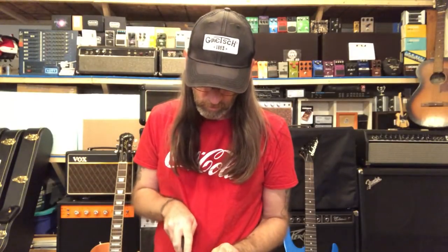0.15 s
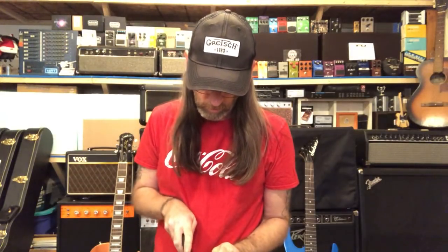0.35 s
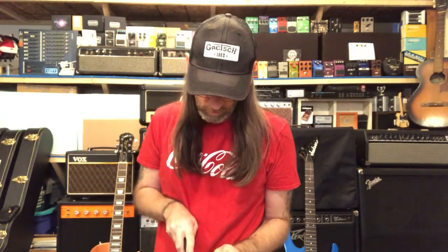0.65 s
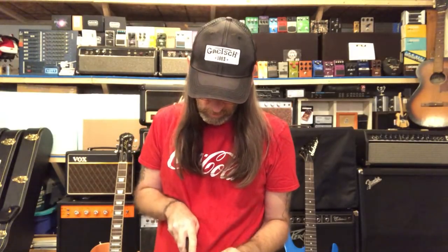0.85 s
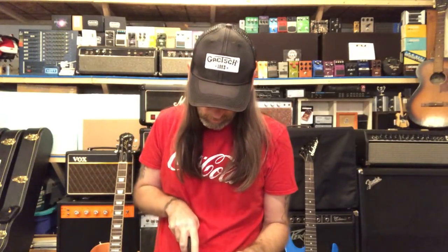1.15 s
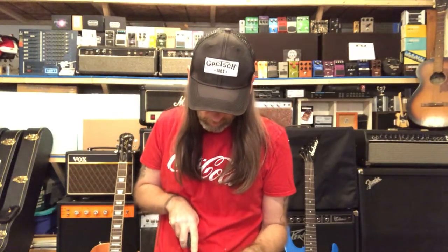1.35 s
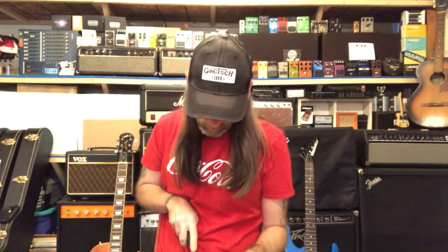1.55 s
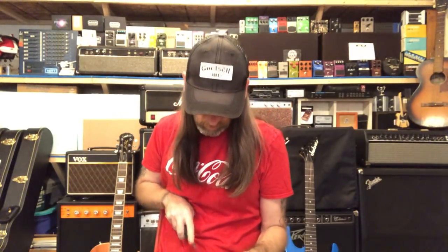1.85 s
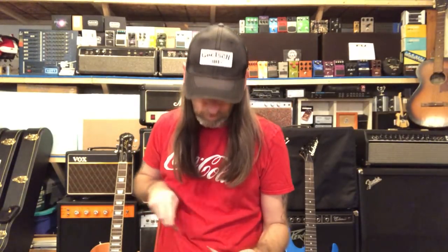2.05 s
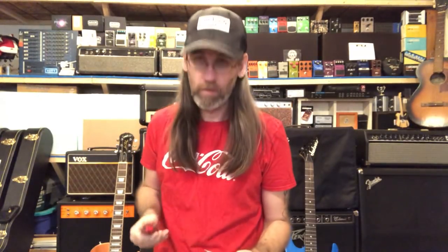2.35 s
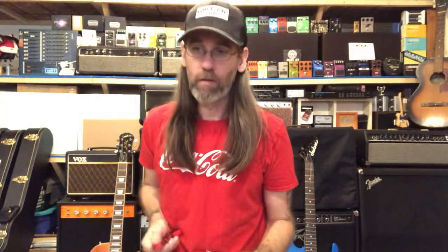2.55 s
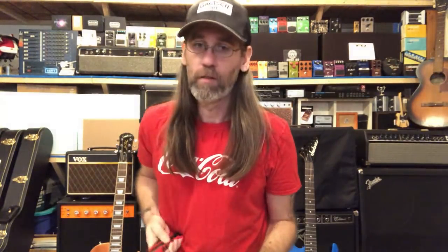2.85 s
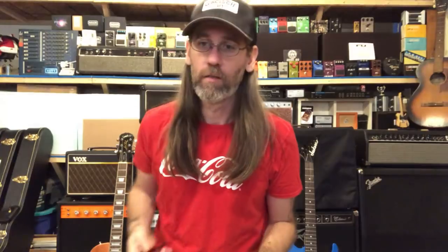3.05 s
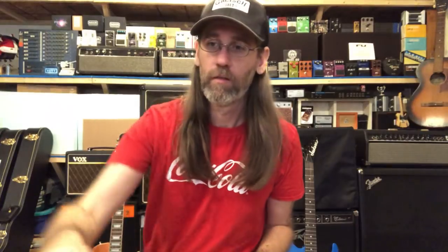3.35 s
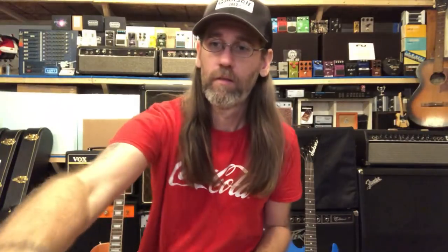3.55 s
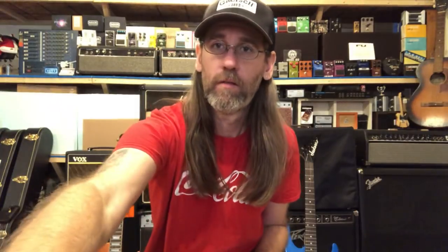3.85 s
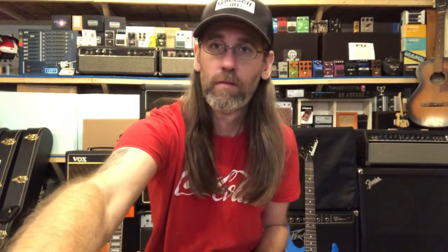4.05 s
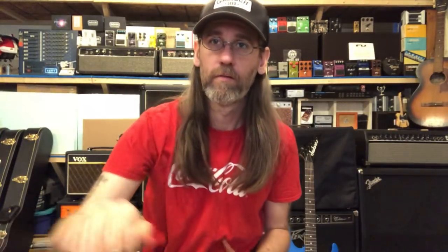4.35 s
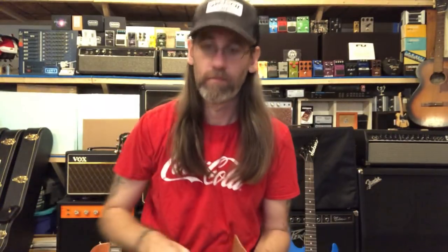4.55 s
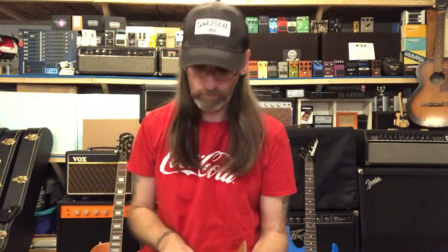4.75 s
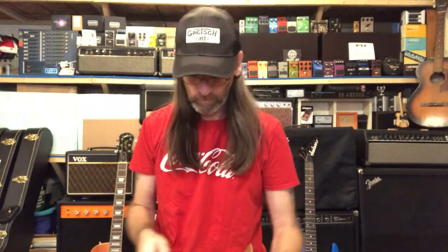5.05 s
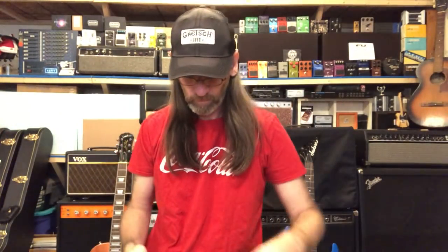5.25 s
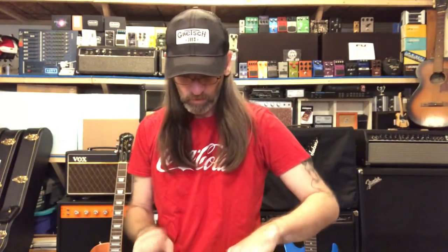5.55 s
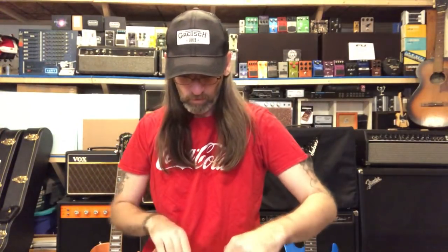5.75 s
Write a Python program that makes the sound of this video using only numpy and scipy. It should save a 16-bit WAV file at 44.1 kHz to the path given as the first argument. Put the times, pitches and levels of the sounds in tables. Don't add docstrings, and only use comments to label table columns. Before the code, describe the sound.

Rough tape cutting on a hollow box, rapid slider clicks, a hard knock of a dropped knife, then quieter cardboard folding.

```python
import sys
import numpy as np
from scipy import signal
from scipy.fft import rfft, irfft, next_fast_len
from scipy.io import wavfile

SR = 44100
rng = np.random.default_rng(int(sys.argv[2]) if len(sys.argv) > 2 else 0)


def wav_out(sig):
    wavfile.write(sys.argv[1], SR, np.round(np.clip(np.atleast_2d(sig).T, -1, 1) * 32767).astype(np.int16))


def decibels_to_gain(level_db):
    exponent = np.asarray(level_db, float) / 20
    return 10 ** exponent


N = 261069

# f/Hz, width/Hz, level/dB
BOX_MODES = [(179, 23, -7.5), (249.5, 29, -3.5), (294, 22, -2), (358, 44, -2.5), (405, 60, -1.5),
             (449.5, 54.5, 1), (602, 130, -5)]
# f/Hz, width/Hz, level/dB
FLAP_MODES = [(690, 130, -2), (963, 270, 0.5), (1150, 194, 2), (1560, 1500, -1.5), (2000, 430, -4)]


def in_time(rows):
    s, *columns = np.transpose(rows)
    return np.array([np.interp(np.arange(N) / SR, s, c) for c in columns])


def at_hz(points, hz):
    point_hz, value = np.transpose(points)
    return np.interp(np.log(np.maximum(hz, 1)), np.log(point_hz), value)


def rms_one(x):
    return x / np.sqrt(np.mean(x ** 2) + 1e-20)


def band(x, low_hz, high_hz):
    sos = signal.butter(2, [low_hz, min(high_hz, .45 * SR)], "band", fs=SR, output="sos")
    return signal.sosfilt(sos, x)


def coloured(x, spectrum):
    size = next_fast_len(len(x))
    gain = decibels_to_gain(at_hz(spectrum, np.fft.rfftfreq(size, 1 / SR)))
    return rms_one(irfft(rfft(x, size) * gain, size)[:len(x)])


def drift(rate_hz, size=N):
    r, run_in = np.exp(-2 * np.pi * rate_hz / SR), int(SR / rate_hz)
    white = rng.standard_normal(size + run_in)
    return rms_one(signal.lfilter([1], [1, -2 * r, r * r], white)[run_in:])


def ring(clicks, hz, t60_s):
    r, w = decibels_to_gain(-60 / (t60_s * SR)), 2 * np.pi * hz / SR
    return signal.lfilter([0, np.sin(w)], [1, -2 * r * np.cos(w), r * r], clicks + 1e-18)


def strike(times_s, level_db, modes, spread_db):
    chance = rng.standard_normal((len(times_s), len(modes)))
    out = np.zeros(N)
    for k, (hz, mode_db, t60_s) in enumerate(modes):
        clicks = np.zeros(N)
        clicks[(times_s * SR).astype(int)] = decibels_to_gain(level_db + mode_db + spread_db * chance[:, k])
        out += ring(clicks, hz, t60_s) * (-1) ** k
    return out


def bursts(times_s, level_db, rise_s, fall_s):
    t = np.arange(int(.3 * SR)) / SR
    shape = (1 - np.exp(-t / rise_s)) ** 2 * np.exp(-t / fall_s)
    out = np.zeros(N + len(t))
    for s, gain in zip(times_s, decibels_to_gain(level_db) / shape.max()):
        start = int(s * SR)
        out[start:start + len(t)] += gain * shape
    return out[:N]


def grains(per_s, size_db, clump_db):
    born = rng.random(N) < per_s * decibels_to_gain(clump_db * drift(25)) / SR
    size = decibels_to_gain(size_db * np.minimum(rng.exponential(1, N), 4))
    return born * size * rng.choice([-1, 1], N)


def spots(noise, times_s, centres_hz, spread):
    out = np.zeros(N)
    starts = (np.append(times_s, times_s[-1] + .3) * SR).astype(int) - 100
    for a, b, hz in zip(starts, starts[1:], centres_hz):
        out[a:b] = rms_one(band(noise[a:b], hz / spread, hz * spread))
    return out


def strokes(rows, mix_db):
    bright_share = [-0.46, 0.13, 0.59, 0.72]
    release_db_per_s = [230.6, 250, 206, 313]
    climb_db = 25.5
    t, out = np.arange(N) / SR, np.zeros((4, N))
    for s, rise_s, hold_s, db, bright_db in rows:
        near = slice(max(int((s - 3 * rise_s) * SR), 0), int((s + hold_s + .3) * SR))
        below_db = climb_db * np.clip((s - t[near]) / rise_s, 0, None)
        letting_go_db = np.outer(release_db_per_s, np.clip(t[near] - s - hold_s, 0, None))
        layer_db = (mix_db + bright_db * np.array(bright_share))[:, None]
        out[:, near] += decibels_to_gain(db + layer_db - below_db - letting_go_db)
    return out


def body(slips, modes):
    out = np.zeros(N)
    for k, (hz, width_hz, db) in enumerate(modes):
        swell = decibels_to_gain(db + 2 * drift(8))
        out += swell * (-1) ** k * rms_one(ring(slips, hz, 2.87 / width_hz))
    return rms_one(out)


def patchy(x):
    edges_hz = 600 * 2 ** np.arange(0, 4, .75)
    out = np.zeros(N)
    for k, (low_hz, high_hz) in enumerate(zip(edges_hz, edges_hz[1:])):
        out += (-1) ** k * band(x, low_hz, high_hz) * decibels_to_gain(2.5 * drift(12))
    return out


def handling():
    # full level at t/s, rise/s, hold/s, level/dB, brightness/dB
    cuts = [(.113, 0.0012, 0.062, -44, 1), (.37, 0.067, 0.051, -54.5, 5), (.505, 0.023, 0.059, -49.5, 3.5),
            (.615, 0.024, 0.02, -35.5, -0.5), (.855, 0.11, 0.0056, -45.5, 3.5),
            (.94, 0.055, 0.033, -36.5, -1), (1.075, 0.011, 0.065, -48.5, -0.5),
            (1.15, 0.14, 0.033, -44.5, -5.5), (1.3, 0.19, 0.019, -48, -4), (1.45, 0.093, 0.023, -38.5, 0.5),
            (1.54, 0.071, 0.081, -51, -8.5), (1.63, 0.034, 0.019, -38, 0), (1.75, 0.021, 0.0094, -57, 13.5),
            (1.805, 0.023, 0.026, -44.5, 16), (1.84, 0.015, 0.035, -42, -16.5),
            (1.897, 0.0043, 0.0066, -49.5, 24.5)]
    fidgets = [(2.1, 0.12, .45, -67, -8.5), (2.312, .004, 0.041, -67.5, 15.5),
               (2.42, 0.034, 0.14, -68.5, 10), (2.61, 0.027, 0.055, -62.5, 10), (3.2, 0.045, .6, -69, -5.5),
               (3.486, 0.045, .008, -75, 15), (3.598, .004, .005, -72.5, 23), (3.74, .04, 0.017, -70, 5),
               (3.79, 0.066, .015, -64.5, 3), (3.87, 0.014, .005, -56, 12),
               (3.937, .004, 0.033, -46.5, -9.5)]
    folds = [(4.2, .02, 0.059, -64, -5), (4.31, .06, 0.16, -60.5, -5.5), (4.52, .04, 0.11, -68.5, 5),
             (4.62, 0.0063, 0.0073, -54.5, -11), (4.65, 0.011, 0.083, -74.5, 25.5),
             (4.78, 0.059, 0.064, -53.5, -1), (4.86, 0.028, 0.045, -58.5, -3),
             (4.95, 0.032, 0.047, -67.5, 8.5), (5.04, 0.1, 0.062, -59.5, 0),
             (5.15, 0.13, 0.08, -57.5, -0.5), (5.322, .01, 0.01, -67.5, -16), (5.44, 0.1, 0.025, -47.5, -2),
             (5.53, 0.023, 0.098, -58.5, 6.5), (5.66, 0.15, 0.079, -64, 6), (5.8, 0.16, 0.042, -50.5, 1),
             (5.88, .02, 0.057, -69.5, 25)]
    cut_mix_db = [-1, -5, -5.5, -10.5]
    fidget_mix_db = [-6.5, -12, -2, -12]
    fold_mix_db = [-3, -3.5, -2, -3]
    # f/Hz, density/dB per Hz
    rasp_spectrum = [(900, -26.5), (1500, -8.5), (2200, -9), (3100, -9), (4300, -6.5), (5200, -8),
                     (6500, -8), (8000, -7.5), (10000, -13.5), (16000, -19.5)]
    # f/Hz, t60/s, level/dB
    blade_sing = [(3000, 0.0065, -12), (4050, 0.002, -19.5)]

    drive = strokes(cuts, cut_mix_db) + strokes(fidgets, fidget_mix_db) + strokes(folds, fold_mix_db)
    box, flap, rasp, fine = drive
    slips = grains(500, size_db=1.5, clump_db=1.5)
    tearing = rms_one(grains(2000, size_db=1.0, clump_db=7.0))
    tearing += 0.64 * rms_one(slips) + 0.4 * rng.standard_normal(N)
    fibres = coloured(tearing, rasp_spectrum)
    dull = signal.sosfiltfilt(signal.butter(2, 5500, fs=SR, output="sos"), fibres)
    sing = np.zeros(N)
    for hz, t60_s, db in blade_sing:
        sing += decibels_to_gain(db + 4 * drift(5.8)) * rms_one(ring(tearing, hz, t60_s))
    sing *= np.arange(N) < 2 * SR
    hollow = band(box * body(slips, BOX_MODES) + flap * body(slips, FLAP_MODES), 170, 4000)
    torn = rasp * (rms_one(patchy(dull)) + sing) + fine * rms_one(fibres - dull)
    return decibels_to_gain(-2.5) * hollow + decibels_to_gain(-5.0) * torn


def taps():
    # t/s, snap/dB, thud/dB, crackle re snap/dB, flap re snap/dB
    snaps = [(0.1132, -27, -28.5, -1, -8), (0.359, -57, -54, -19, 6), (.5, -51, -56, -15, 8),
             (.525, -37, -50, -15, -5), (.609, -31.5, -26, -14, -22), (0.6437, -42, -26, -24, -13),
             (0.8486, -34, -46, -21, -2), (0.906, -31.5, -53, -21, -16), (.924, -30, -55, -12, -13),
             (0.944, -35, -49, -17, 6), (0.9658, -28.5, -48, -19, -5), (1.0084, -47, -32, -21, -17),
             (1.0703, -43.5, -31.5, -23, 11), (1.41, -44, -40, -10, -3), (1.4296, -55, -55, 0, -5),
             (1.4562, -32, -52, -12, -12), (1.4485, -38, -63, -24, 13.5), (1.5875, -37, -30, -13, 4),
             (1.605, -46, -55, -15, -10), (1.6285, -36, -51, -14, 3), (1.6573, -32, -42, -11, -6),
             (1.7514, -43.5, -55, -14, 5), (1.7847, -45, -34.5, -8, 5.5), (1.798, -40.5, -45, -10, 12),
             (1.8254, -27.5, -28, -0.5, 4), (1.8295, -25.5, -26, -13, -3), (1.8588, -42, -29, -8, -10),
             (1.8697, -38, -27.5, -24, -17), (1.887, -42, -46, -5, -10), (1.8948, -25, -46, 0.5, 2.5),
             (1.8978, -30, -50, -15, -17), (1.9025, -27, -55, -15, -5)]
    # t/s, snap/dB, snap centre f/Hz, thud/dB
    ticks = [(1.6319, -35, 4800, -29), (1.6605, -39, 4900, -49), (2.316, -34, 3900, -75),
             (2.322, -39, 3740, -71), (2.416, -41.5, 3660, -73), (2.4255, -37, 4380, -75),
             (3.371, -55, 7600, -71), (3.489, -51.5, 6800, -76), (3.597, -44.5, 6800, -65),
             (3.714, -49.5, 3000, -73.5), (3.746, -51, 3990, -72), (4.354, -50.5, 2194, -70),
             (4.4453, -50, 2210, -41), (4.366, -54, 11000, -75), (4.456, -54, 9000, -77),
             (4.6191, -34, 1000, -33), (4.647, -41.5, 6500, -40), (4.779, -56, 1200, -34.5),
             (4.854, -40, 1620, -34), (4.873, -38.5, 1590, -39), (4.895, -48, 1600, -36.5),
             (5.3181, -35, 797, -44.5), (5.3875, -49, 5160, -45), (5.41, -47, 5460, -63),
             (5.457, -45, 2020, -59), (5.484, -47, 2000, -44), (5.529, -44, 3900, -57)]
    tape_hz = 3000

    rows = [(s, db, tape_hz, db + crackle, thud, db + flap) for s, db, thud, crackle, flap in snaps]
    rows += [(s, db, hz, db - 21.5, thud, (db + thud) / 2 - 32) for s, db, hz, thud in ticks]
    s, snap_db, snap_hz, crackle_db, thud_db, flap_db = np.transpose(sorted(rows))
    box_ring = [(hz, db, 2.0 / width_hz) for hz, width_hz, db in BOX_MODES]
    flap_ring = [(hz, db, 3.3 / width_hz) for hz, width_hz, db in FLAP_MODES]
    thud = strike(s, thud_db - 7.0, box_ring, spread_db=2.0)
    thud += strike(s, flap_db - 5.5, flap_ring, spread_db=2)
    noise = rng.standard_normal(N)
    snap = bursts(s, snap_db - 10.0, rise_s=0.00062, fall_s=.002)
    snap *= spots(noise, s, snap_hz, spread=1.45)
    crackle = bursts(s, crackle_db, rise_s=0.000068, fall_s=.0006) * rms_one(band(noise, 4000, 13400))
    return band(thud, 156, 6200) + snap + crackle


def rubs():
    # t/s, length/s, start f/Hz, end f/Hz, width/Hz, level/dB
    rub_rows = [(1.6, .09, 4900, 4900, 290, -53.5), (1.3, .07, 9400, 5200, 300, -65),
                (1.6, .04, 6000, 4000, 300, -58), (1.79, .04, 5050, 4300, 270, -49.5),
                (.485, 0.059, 760, 900, 500, -52.5), (1.11, 0.073, 1150, 1140, 227, -46.5),
                (1.7, 0.013, 1600, 1500, 300, -48), (.935, 0.074, 1040, 940, 230, -41.5),
                (1.8, .03, 1200, 1600, 270, -47), (3.375, .001, 1058, 970, 56, -51.5),
                (3.73, .03, 1139, 1100, 121, -62), (4.31, 0.149, 1170, 1110, 151, -57.5),
                (5.64, 0.096, 1430, 1400, 255, -52), (5.64, 0.2, 760, 699, 250, -57.5),
                (5.772, 0.039, 1253, 1230, 160, -59)]
    edge_s = .01
    out = np.zeros(N)
    for s, length_s, start_hz, end_hz, width_hz, db in rub_rows:
        at = np.arange(int((s - edge_s) * SR), int((s + length_s + edge_s) * SR))
        t, size = at / SR, SR // 4
        hz = np.interp(t, [s, s + length_s], [start_hz, end_hz])
        on = np.clip(np.minimum(t - s, s + length_s - t) / edge_s + 1, 0, 1)
        swing = decibels_to_gain(db + 2 * drift(29.4, size=size))
        rough = (swing * drift(width_hz, size=size))[:len(at)]
        out[at] += on * rough * np.sin(2 * np.pi * np.cumsum(hz) / SR)
    return out


def ratchet():
    # t/s, peak level/dB, loudest f/Hz
    tooth_rows = [
        (2.656, -6, 3650),
        (2.6907, -6.5, 7500),
        (2.723, -6.5, 3600),
        (2.7548, -6.5, 6150),
        (2.794, -6.5, 5200),
        (2.833, -8, 6700),
        (2.8632, -10, 7800),
        (2.8925, -5.5, 4700),
        (2.9271, -4.5, 4750),
    ]
    # f/Hz, density/dB per Hz
    slider = [(700, -30.5), (1300, -16), (2200, -8), (3800, -4), (5000, -5.5), (7500, -0.5), (9000, -7),
              (11500, -4), (16000, -10)]
    # f/Hz, level/dB, t60/s
    blade_modes = [(9345, -39, .45), (9360, -46, .4), (11400, -36, .06), (13390, -35, .08)]

    s, peak_db, spot_hz = np.transpose(tooth_rows)
    shell_hz = np.where(s < 2.81, 3760, 2650)
    noise, other = rng.standard_normal((2, N))
    splinters = rms_one(grains(24000, size_db=-0.5, clump_db=-3.5))
    crack = coloured(splinters, slider) + 0.63 * spots(noise, s, spot_hz, spread=1.1)
    teeth = bursts(s - .001, peak_db - 12, rise_s=0.001, fall_s=0.0013) * crack
    slap = np.zeros(N)
    slap[((s + .0003) * SR).astype(int)] = -decibels_to_gain(peak_db)
    teeth += band(slap, 2100, 14000)

    low_buzz = rms_one(band(coloured(other, slider), 900, 6200))
    high_buzz = rms_one(band(other, 8000, 13000))
    buzz = bursts(s, peak_db - 35.0, rise_s=0.00097, fall_s=0.056) * low_buzz
    buzz += bursts(s, peak_db - 40.0, rise_s=0.0013, fall_s=0.023) * high_buzz
    shell = bursts(s, peak_db - 41.5, rise_s=0.0024, fall_s=0.063)
    shell *= spots(other, s, shell_hz, spread=1.154)
    grip = bursts(s, peak_db - 50.5, rise_s=0.0026, fall_s=0.017) * rms_one(band(noise, 170, 700))
    blade = strike(s[-1:], peak_db[-1:], blade_modes, spread_db=0)
    return teeth, buzz + shell + grip + blade


def knocks():
    # t/s, handle/dB, table/dB, rattle/dB
    contacts = [(3.8523, -25.5, -24, -40), (3.858, -45, -37, -35.5), (3.8616, -46, -43, -31),
                (3.8662, -46.5, -38, -24.5), (3.8699, -46.5, -52.5, -29.5), (3.8738, -47, -51, -37),
                (3.9378, -32, -33, -57), (3.949, -43, -54.5, -42), (4.007, -2.5, -15.5, -18.5),
                (4.0093, -12.5, -40, -22), (4.0176, -14.5, -41, -28.5), (4.022, -18, -28.5, -15.5),
                (4.028, -23, -14, -32), (4.042, -37.5, -24, -27), (4.063, -6.5, -18, -21),
                (4.0649, -10.5, -36, -30), (4.0736, -35, -51, -24.5), (4.087, -22, -30, -32)]
    # f/Hz, level/dB, t60/s
    table_modes = [(60, -16, 0.36), (126, -13.5, 0.26), (253, 4.5, 0.05), (353, 4, 0.025), (457, 2, 0.049),
                   (525, 9, 0.011), (771, -3, 0.044)]
    # f/Hz, level/dB, t60/s
    handle_modes = [(1307, -3.5, 0.028), (1400, 5, 0.0091), (1567, -1.5, 0.012), (2020, -25, 0.0067),
                    (2500, -7, 0.0055), (3310, -17, 0.002)]
    # f/Hz, level/dB, t60/s
    loose_blade = [(6600, -4, .03), (9150, 0, .03), (11400, -3, .03), (13500, -6, .03)]

    s, handle_db, table_db, rattle_db = np.transpose(contacts)
    crack = np.zeros(N)
    crack[(s * SR).astype(int)] = decibels_to_gain(handle_db + 17.0)
    wood = strike(s, table_db - 10.5, table_modes, spread_db=1.5)
    wood += strike(s, handle_db - 10.5, handle_modes, spread_db=2)
    wood += band(band(crack, 910, 3200), 900, 5500)
    for _ in range(5):
        wood = signal.lfilter([-.86, 1], [1, -.86], wood)
    clatter = band(rng.standard_normal(N), 1700, 4500)
    clatter += 0.31 * band(rng.standard_normal(N), 4500, 12000)
    rattle = bursts(s, rattle_db - 1.5, rise_s=0.0003, fall_s=.0016) * rms_one(clatter)
    return wood + rattle + strike(s, rattle_db - 25, loose_blade, spread_db=5)


def room(x, tail_db, echo_db):
    # f/Hz, t60/s
    room_t60 = [(150, 0.15), (600, 0.29), (2000, 0.33), (5000, 0.35), (10000, 0.32), (16000, 0.18)]
    # delay t/s, level/dB
    echoes = [(.0075, -19.5), (.012, -19.5)]
    t = np.arange(int(.6 * SR)) / SR
    edges_hz = 100 * 2 ** np.arange(0, 7.6, .75)
    noise, tail = rng.standard_normal(len(t)), np.zeros(len(t))
    for k, (low_hz, high_hz) in enumerate(zip(edges_hz, edges_hz[1:])):
        decay = decibels_to_gain(-60 * t / at_hz(room_t60, np.sqrt(low_hz * high_hz)))
        tail += (-1) ** k * band(noise, low_hz, high_hz) * decay
    reply = decibels_to_gain(tail_db) * tail * np.clip(t / 0.0038, 0, 1) / np.sqrt(np.sum(tail ** 2))
    for s, db in echoes:
        reply[int(s * SR)] += decibels_to_gain(db + echo_db)
    return x + signal.fftconvolve(x, reply)[:N]


def engine():
    # t/s, main order f/Hz, level/dB
    revs = [(0, 84, -64), (.3, 88, -64), (.8, 97, -57), (1.29, 107, -59), (1.9, 116, -62.5),
            (2.3, 121.5, -63.5), (2.6, 113, -60.5), (3.0, 91, -57.5), (3.25, 87, -63.5), (3.8, 88.5, -64.5),
            (4.0, 88, -89), (4.5, 85, -75.5), (5.1, 69, -76), (5.92, 62, -77)]
    orders = [.6, 1, 1.2, 1.6, 2.2]
    orders_db = [-9, -1.1, -14, 3, -6.5]
    # f/Hz, width/Hz, level/dB
    booms = [(49.7, 8, -3.5), (98.4, 12, -0.5), (114.5, 16, 0), (134, 16.3, 2.5), (188.2, 9.2, -2)]
    hz, db = in_time(revs)
    phase, out = 2 * np.pi * np.cumsum(hz) / SR, np.zeros(N)
    for k, order_db in zip(orders, orders_db):
        lift = decibels_to_gain(-15) * (k * hz < 200)
        for boom_hz, width_hz, boom_db in booms:
            lift = lift + decibels_to_gain(boom_db) / (1 + (2 * (k * hz - boom_hz) / width_hz) ** 4)
        level = decibels_to_gain(db + order_db + 0.73 * drift(10.0))
        out += np.sqrt(2) * lift * level * np.sin(k * phase)
    return out


def hiss():
    # f/Hz, density/dB per Hz
    air = [(18, -50.5), (30, -15.5), (90, -6.5), (134, -8), (227, -12), (486, -18.5), (866, -22),
           (1070, -23), (1630, -28), (7470, -33.5), (8520, -39.5), (14800, -40), (16000, -43.5)]
    return decibels_to_gain(-64.5) * coloured(rng.standard_normal(N), air)


def scene():
    teeth, buzz = ratchet()
    near = room(handling() + taps() + rubs() + knocks(), tail_db=-8.5, echo_db=-1.0) + buzz
    near += room(teeth, tail_db=-11, echo_db=5)
    return (near + engine() + hiss())[None]


def top_cut(x):
    return signal.sosfilt(signal.butter(12, 16970, fs=SR, output="sos"), x)


def record(dry):
    thin = signal.sosfilt(signal.butter(3, 45, "high", fs=SR, output="sos"), dry)
    cut = signal.sosfilt(signal.cheby2(12, 40, 16250, fs=SR, output="sos"), thin)
    return top_cut(cut)


dry = scene()
out = record(dry)
wav_out(out)
```